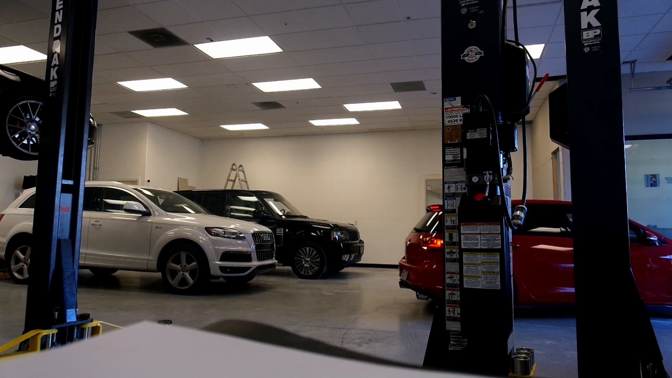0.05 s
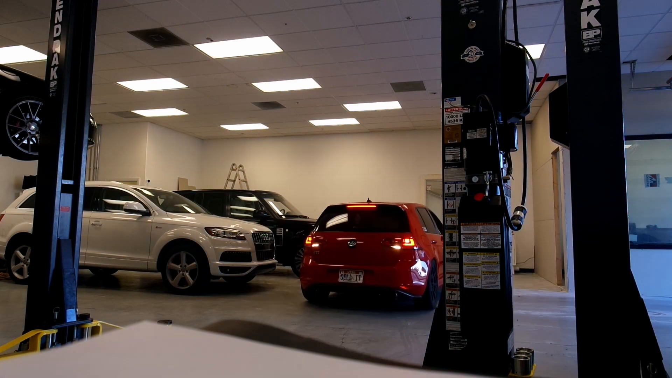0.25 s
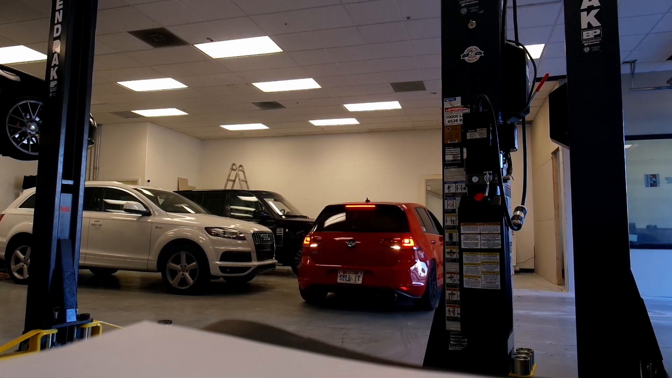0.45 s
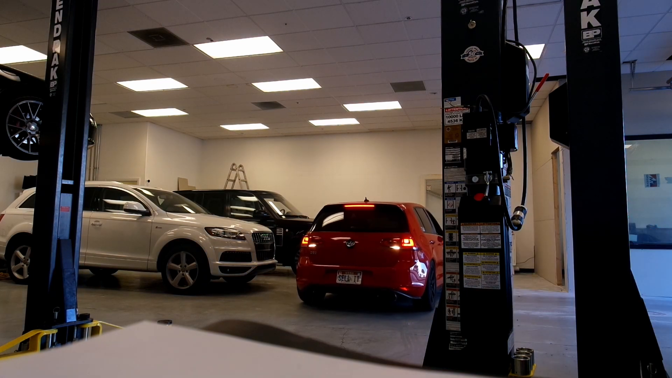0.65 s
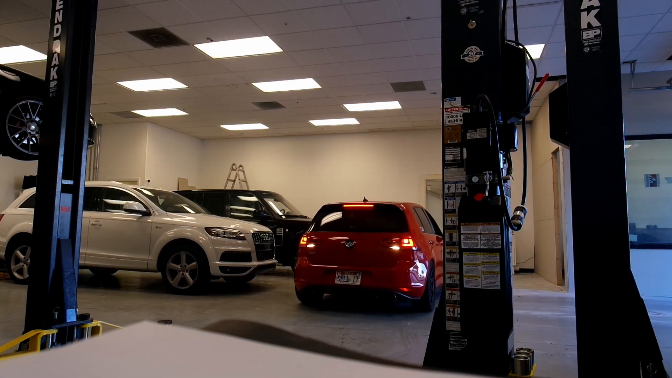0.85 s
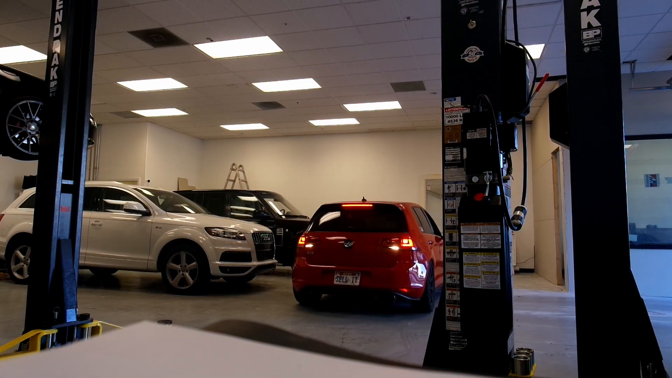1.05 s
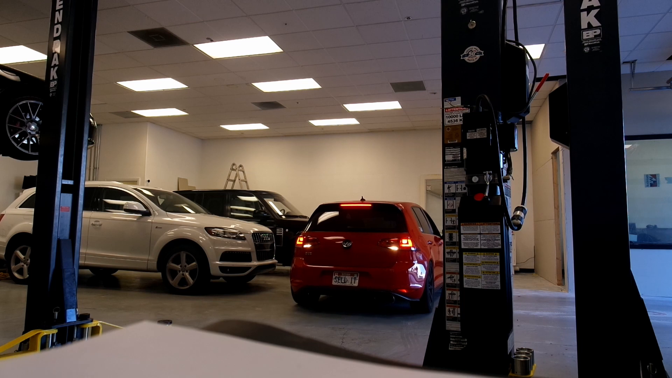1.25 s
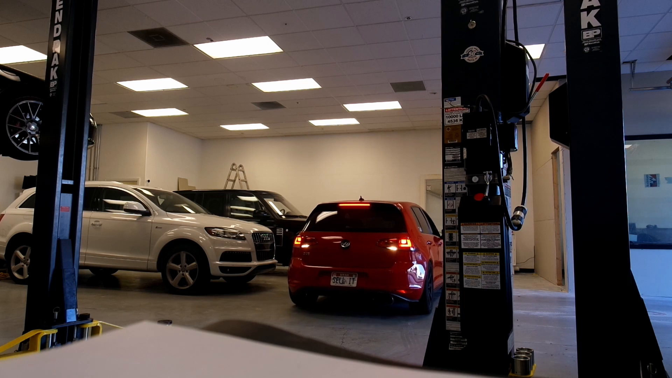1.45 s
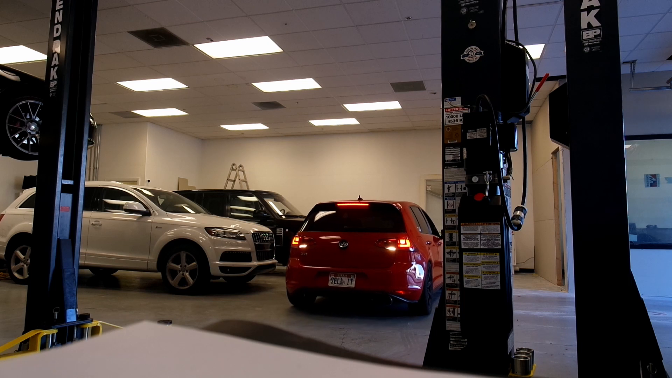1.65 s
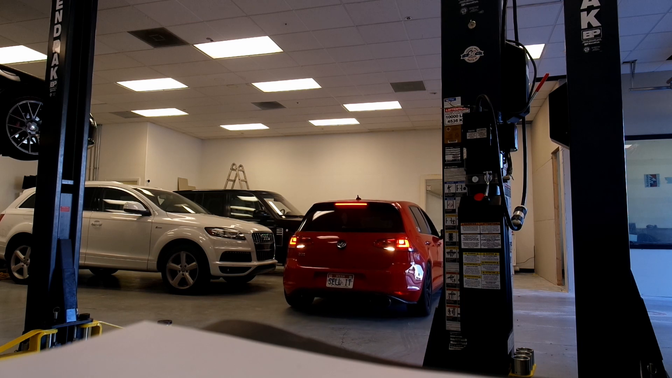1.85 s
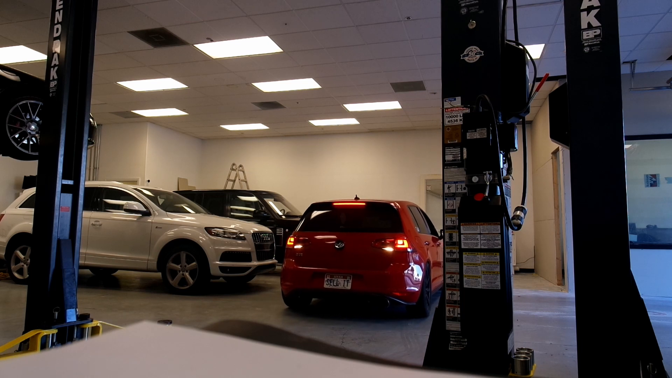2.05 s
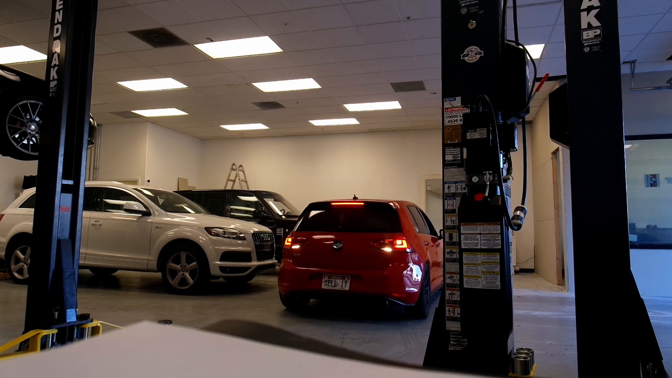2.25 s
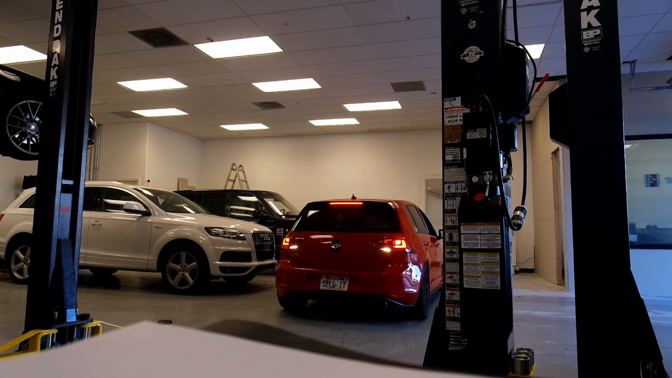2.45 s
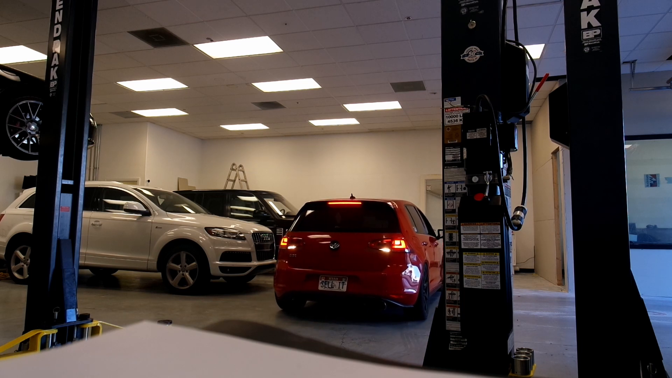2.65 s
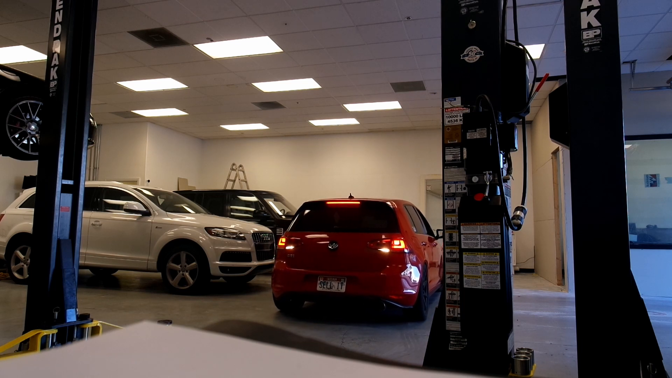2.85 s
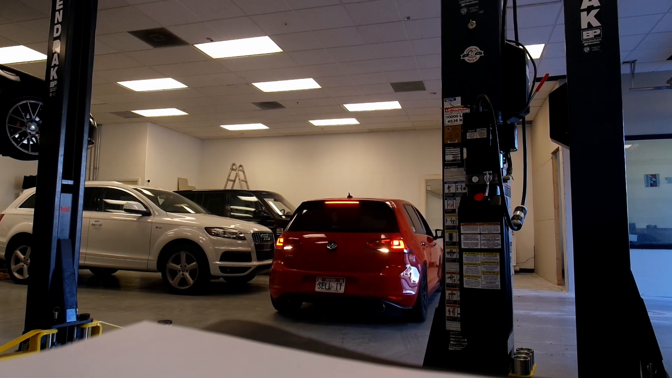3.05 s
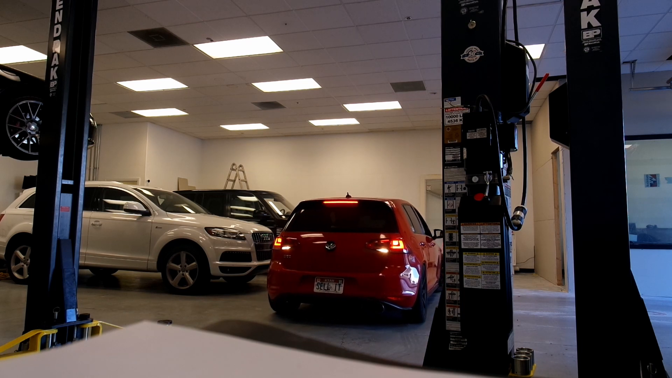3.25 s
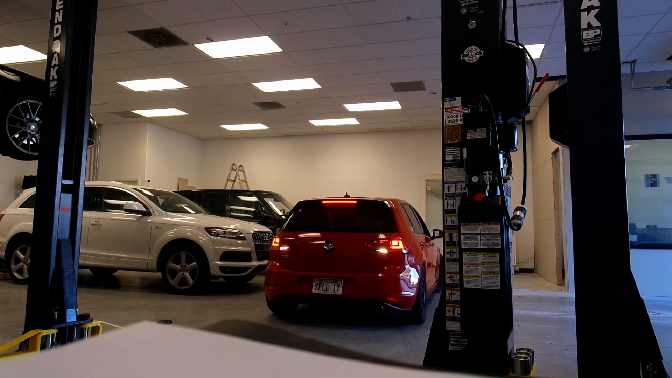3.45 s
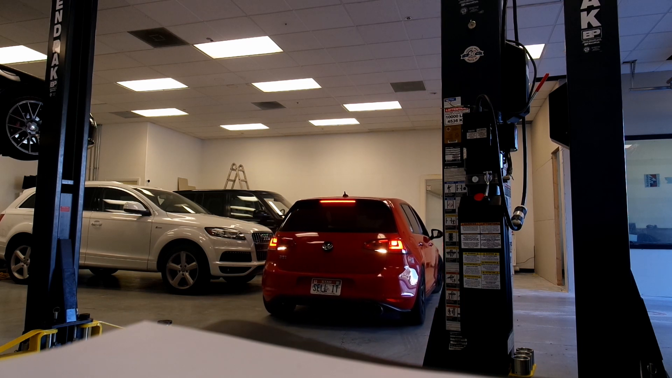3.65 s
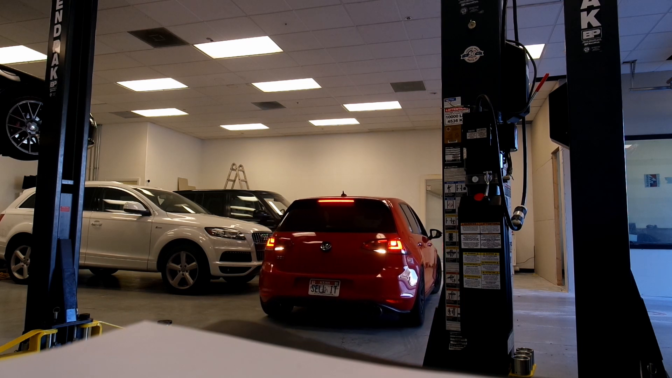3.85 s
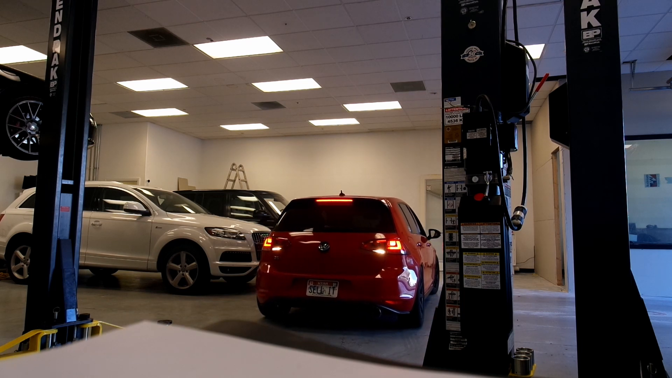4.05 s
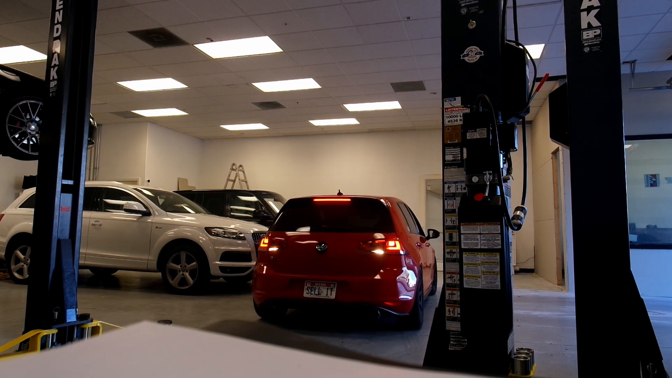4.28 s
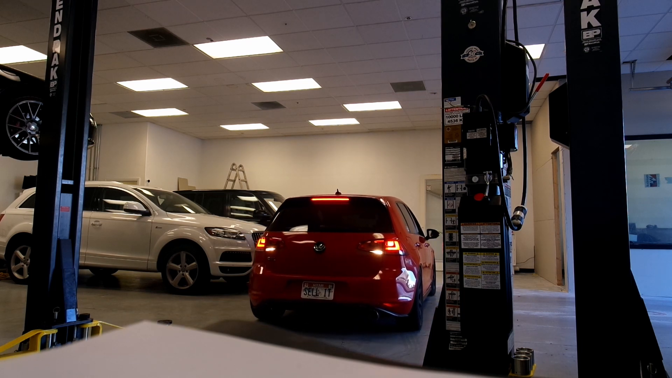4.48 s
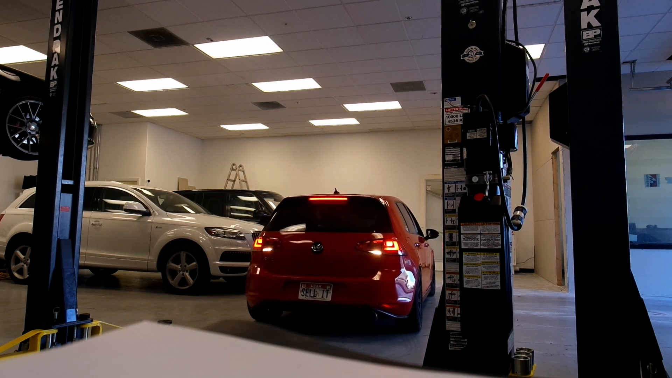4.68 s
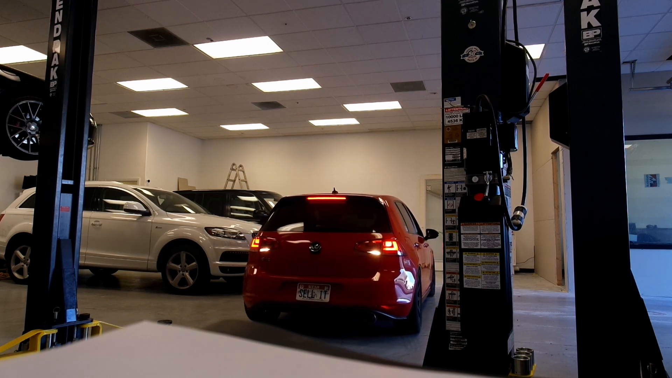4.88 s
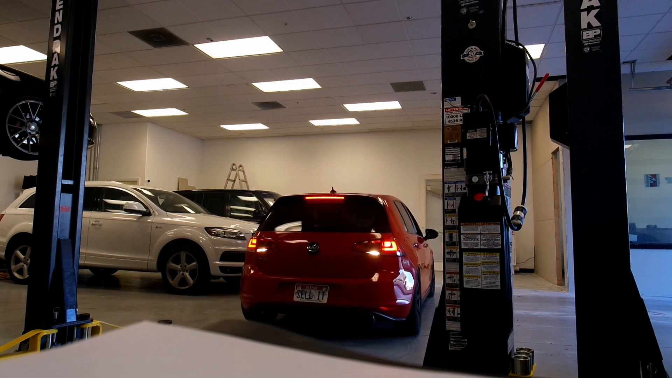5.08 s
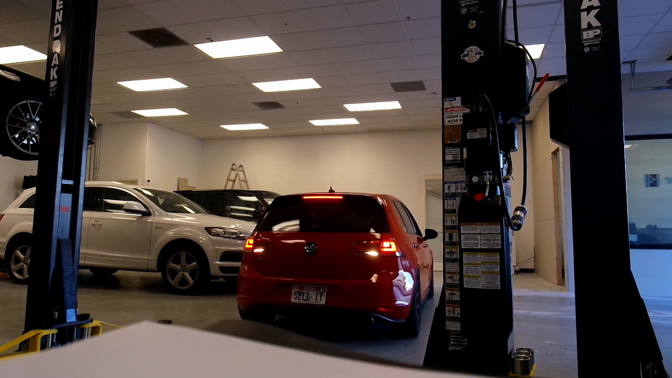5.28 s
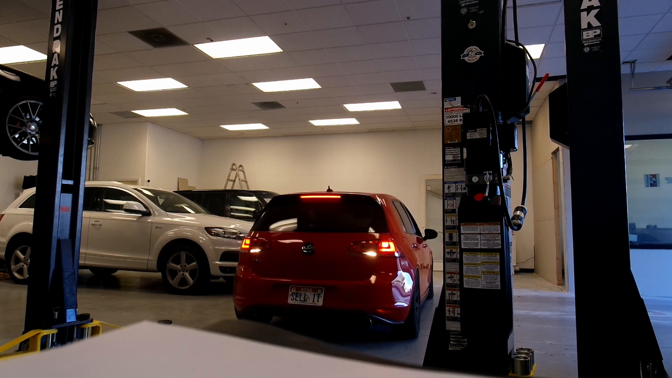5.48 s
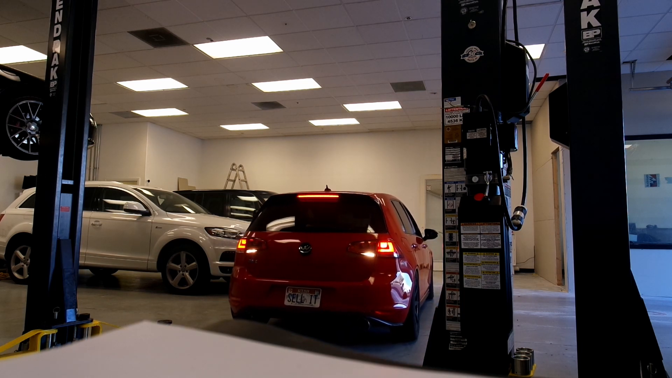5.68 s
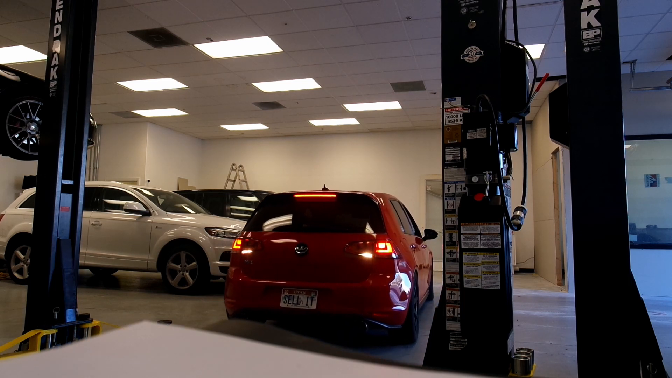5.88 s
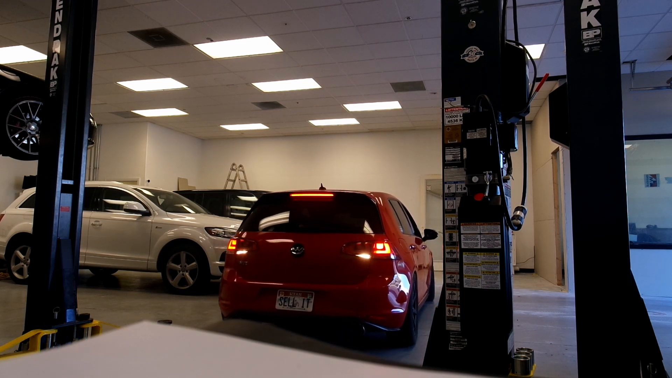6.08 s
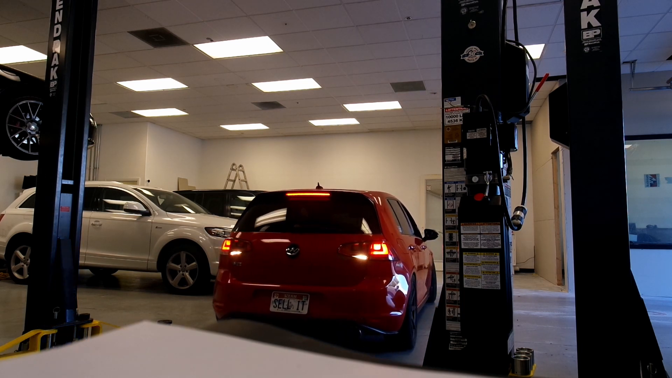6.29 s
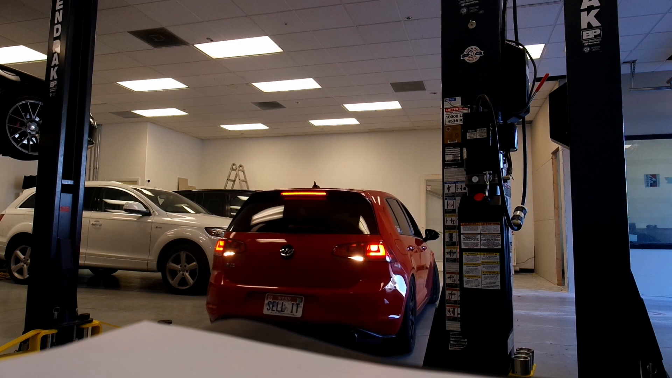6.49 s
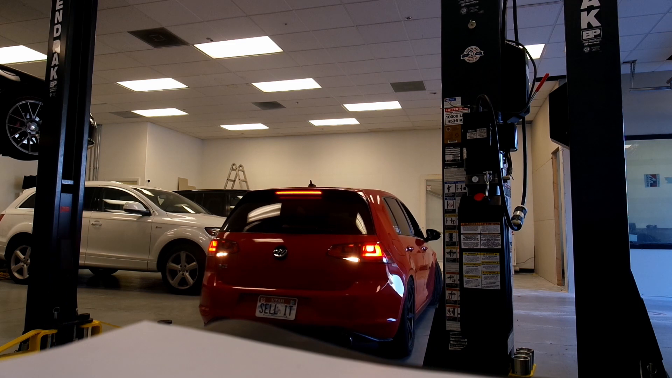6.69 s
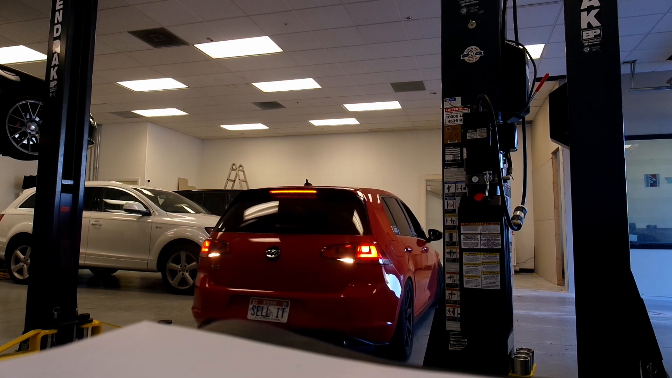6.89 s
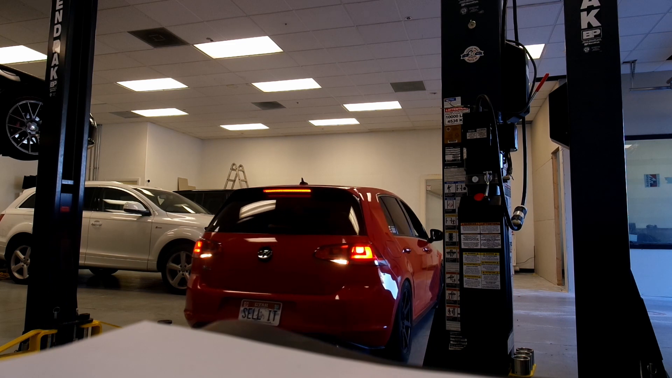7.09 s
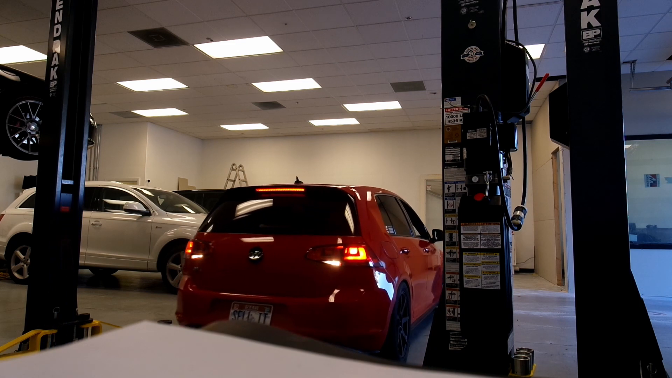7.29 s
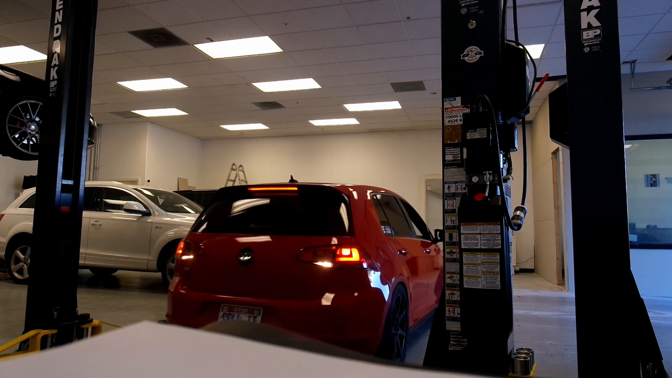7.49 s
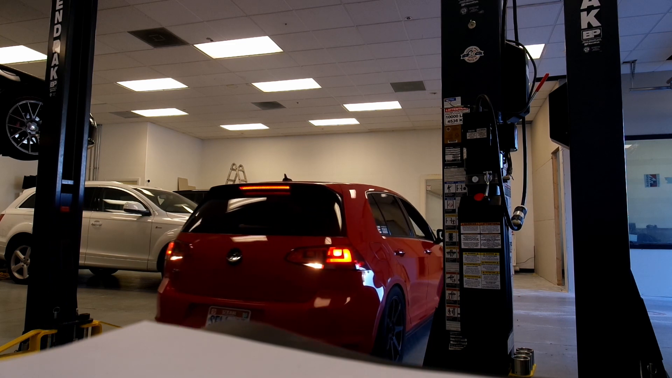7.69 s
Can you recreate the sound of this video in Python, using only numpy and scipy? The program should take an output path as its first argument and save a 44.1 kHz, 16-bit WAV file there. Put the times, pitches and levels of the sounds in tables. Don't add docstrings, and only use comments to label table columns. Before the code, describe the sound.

A small four-cylinder car backs slowly closer in a hard-walled workshop, its exhaust booming at idle with rattling knocks, faint tyre scrubs and brake groans.

```python
import sys
import numpy as np
from scipy import signal
from scipy.fft import rfft, irfft, next_fast_len
from scipy.io import wavfile

SR = 44100
rng = np.random.default_rng(int(sys.argv[2]) if len(sys.argv) > 2 else 0)


def volts_from_decibels(level):
    exponent = np.asarray(level, float) / 20
    return 10 ** exponent


def file_out(sig):
    cols = np.atleast_2d(sig).T
    lim = np.clip(cols, -1, 1)
    pcm = np.round(lim * 32767).astype(np.int16)
    wavfile.write(sys.argv[1], SR, pcm)


N = 340893
T_S = np.arange(N) / SR
CHANGE_S = 0.209
IDLE_PER_S = 28
MIDWAY_DB = -14

# [t/s, peak level/dB, favoured f/Hz]
HARD_KNOCK_EVENTS = [(0.733, -20, 945), (0.948, -24, 921), (1.232, -18, 1160), (1.729, -21, 929),
                     (1.799, -25, 821), (1.871, -21, 880), (2.01, -19, 900), (2.151, -26, 780),
                     (2.294, -25, 842), (2.438, -22, 880), (2.724, -17.5, 830), (2.795, -19, 840),
                     (3.833, -21, 740), (1.448, -26.5, 735), (3.033, -18.5, 880), (3.134, -22, 910),
                     (3.414, -25, 829), (3.448, -21, 826), (3.588, -23, 818), (3.694, -17, 740),
                     (4.262, -24, 816), (4.802, -21, 681), (5.548, -17, 826), (6.045, -19, 740),
                     (6.252, -20, 740), (6.468, -18.5, 740), (7.35, -25, 700), (6.613, -21, 760),
                     (6.689, -19, 662), (7.316, -18, 730)]


def rms_one(x):
    return x / np.sqrt(np.mean(x ** 2) + 1e-20)


def in_time(rows):
    s, value = np.transpose(rows)
    return np.interp(T_S, s, value)


def drift(rate_hz):
    r = np.exp(-80 * np.pi * rate_hz / SR)
    slow = signal.lfilter([1], [1, -2 * r, r * r], rng.standard_normal(N // 40 + 2002))[2000:]
    return np.interp(np.arange(N) / 40, np.arange(len(slow)), rms_one(slow))


def coloured(spectrum):
    size = next_fast_len(N)
    hz, db = np.transpose(spectrum)
    bin_hz = np.arange(size // 2 + 1) * SR / size
    gain = volts_from_decibels(np.interp(np.log(bin_hz + 1), np.log(hz), db, -90, -90))
    return rms_one(irfft(gain * rfft(rng.standard_normal(size)), size)[:N])


def resonate(x, hz, width_hz):
    r = np.exp(-np.pi * width_hz / SR)
    poles = [1, -2 * r * np.cos(2 * np.pi * hz / SR), r * r]
    return signal.lfilter([(1 - r * r) / 2, 0, (r * r - 1) / 2], poles, x)


def resonate_twice(x, hz, width_hz):
    return resonate(resonate(x, hz, width_hz), hz, width_hz)


def throb(firings, at, depth_db):
    return volts_from_decibels(depth_db * np.cos(2 * np.pi * (firings - at)))


def plateaus(spells):
    edge_s = 0.07
    return sum(db * (np.tanh((T_S - start) / edge_s) - np.tanh((T_S - end) / edge_s)) / 2
               for start, end, db in spells)


def crank(per_s):
    change = np.clip((T_S - CHANGE_S) / 0.006, 0, 1)
    return 0.14 + np.cumsum(per_s) / SR - 0.305 * change


def order_levels(per_s, boom_db):
    # [order, midway idle level/dB, share of nearness, slope/dB per firing/s off idle, bend/dB per its square]
    order_laws = [(2, -30, -0.21, -1, -1), (3, -29, -0.4, 1, -0.8), (5, -25, 0.8, 3.5, -4.5),
                  (6, -40, -.4, 0.3, -0.5), (7, -41, 0.18, 1.5, -0.2), (10, -43.5, 0.72, 2.5, -1.2),
                  (13, -39, 0.1, 1.5, -8)]
    early_levels = [-38, -49, -26, -50, -38.5, -60, -49]
    # [start t/s, end t/s, level/dB]
    standing_waves = [
        [(.95, 2.25, 1), (5.55, 6.05, -4), (6.12, 6.6, 3)],
        [(1.5, 2.74, -3.5), (5.4, 6.18, 2), (3, 5, -2.5)],
        [(1.6, 2.22, 4.5), (5.4, 6.75, 4)],
        [(2.3, 2.68, -7), (4.3, 4.68, -6), (5.33, 7.9, -9)],
        [(0.15, .95, 6), (1.63, 2.27, -7), (6, 6.6, 2), (6.9, 7.9, 6), (5.27, 5.36, -10), (4.15, 5, -2.5)],
        [(4.13, 4.63, -8), (5.25, 5.73, 5), (6.7, 7.73, -9), (2.25, 2.75, -11), (5.99, 6.75, 3),
         (3.1, 3.6, 2.5), (4.8, 5.2, -4.5)],
        [(.2, 1.45, -6.5), (3.65, 4.3, 3), (5.2, 6.0, -3), (6.2, 6.7, -22), (6.98, 7.9, -6)],
    ]
    off = per_s - IDLE_PER_S
    levels = []
    for (_, db, near, slope, bend), waves, early_db in zip(order_laws, standing_waves, early_levels):
        later_db = db + near * (boom_db - MIDWAY_DB) + slope * off + bend * off ** 2 + plateaus(waves)
        levels.append(np.where(T_S < CHANGE_S, early_db, later_db))
    return levels


def exhaust(firings, per_s, boom_db, levels):
    # [order, level/dB, wander/dB, pipe lag/rad]
    minor_orders = [(1, -41.5, 1.0, 2.4), (1.5, -54, 1.5, .5), (2.5, -56, 2.0, .5), (5.5, -55, 2.0, .5),
                    (7.5, -55, 2.0, .5), (8, -48, 2.0, .5), (11, -52, 2.0, .5), (12, -53, 2.0, -2.0),
                    (12.5, -48, 2.0, 2.8)]
    slip = (1.4 - 0.8 * (per_s - 28)) / (1 + (T_S / 4.2) ** 3)
    two, three, five, six, *buzz = levels
    since = T_S - CHANGE_S
    settling = 1.5 * np.exp(-(since / 0.16) ** 2) * (since > 0)
    orders = [(2, two, 0.15), (3, three, slip), (5, five, slip + settling)]
    orders += [(6, six + 1.2 * drift(1.3), 2.5)]
    orders += [(k, db, slip + 0.4 * drift(0.6)) for k, db in zip((7, 10, 13), buzz)]
    orders += [(k, db + wander_db * drift(1.0), lag) for k, db, wander_db, lag in minor_orders]
    uneven = throb(firings / 2, 0.88, 0.33)
    out = -volts_from_decibels(boom_db + 0.27 * drift(16.0)) * uneven * np.cos(8 * np.pi * firings)
    for k, db, lag in orders:
        out += volts_from_decibels(db + 0.48 * drift(7.5)) * np.cos(2 * np.pi * k * firings - lag)
    return np.sqrt(2) * out


def rasp(firings):
    # [f/Hz, width/Hz, level/dB]
    pipe_modes = [(352.5, 35, 1), (280, 70, -4), (237, 28, -12.5), (493.4, 38, -7)]
    gas = rng.standard_normal(N) * throb(firings, 0.67, 0.83) * throb(firings / 2, 0.71, 0.62)
    return rms_one(sum(volts_from_decibels(db) * resonate_twice(gas, hz, width_hz) / np.sqrt(width_hz)
                       for hz, width_hz, db in pipe_modes))


def ring_block(at, force_db, favour_hz):
    # [f/Hz, level/dB, t60/s]
    block_modes = [(727, -.5, 0.06), (830, 1.2, 0.055), (916, -0.5, 0.046), (1018, -4, 0.028),
                   (1173, 2.5, 0.058)]
    out = np.zeros(N)
    luck = rng.standard_normal((len(at), len(block_modes)))
    for k, (hz, db, t60_s) in enumerate(block_modes):
        clicks = np.full(N, 1e-18)
        clicks[at] = volts_from_decibels(force_db + db + 1.5 * luck[:, k] - 0.03 * abs(favour_hz - hz))
        r, w = volts_from_decibels(-60 / (t60_s * SR)), 2 * np.pi * hz / SR
        out += signal.lfilter([0, np.sin(w)], [1, -2 * r * np.cos(w), r * r], clicks)
    return resonate(resonate(out, 860, 420), 940, 450)


def knocks(firings):
    count = np.floor(firings - 0.35)
    at = np.flatnonzero(np.diff(count) > 0)
    turn = count[at + 1]
    luck = np.clip(rng.standard_normal((len(at), 2)), -3, 0.7)
    gap_s = np.abs(at[:, None] / SR - np.array(HARD_KNOCK_EVENTS)[:, 0]).min(axis=1)
    taken = gap_s <= 0.012
    force_db = -3.0 * (turn % 2) + 0.63 * (turn % 4 == 0) + 3.1 * luck[:, 0] - 30 * taken
    play_s = 0.0007
    at = at + (play_s * SR * np.abs(rng.standard_normal(len(at)))).astype(int)
    favour_hz = 910 - 20 * at / SR + 90 * luck[:, 1]
    return rms_one(ring_block(np.minimum(at, N - 1), force_db, favour_hz))


def hard_knocks():
    s, db, hz = np.transpose(HARD_KNOCK_EVENTS)
    return ring_block((s * SR).astype(int), db - 7.0, hz)


def shield():
    # [f/Hz, width/Hz, level/dB]
    sheet_modes = [(728, 15.4, 3.5), (835, 24, -5.5), (1155, 19, -7.5)]
    shake = rng.standard_normal(N)
    return sum(volts_from_decibels(db + 1.3 * drift(1.5)) * rms_one(resonate_twice(shake, hz, width_hz))
               for hz, width_hz, db in sheet_modes)


def loose_parts(firings):
    # [f/Hz, density/dB per Hz]
    clatter_spectrum = [(380, -1), (520, -3.5), (650, -2.5), (850, -6), (1240, -5), (1420, -16),
                        (2200, -16)]
    wander = volts_from_decibels(1.06 * drift(9.6) + 0.52 * drift(4.7))
    return coloured(clatter_spectrum) * throb(firings, 0.57, 0.86) * wander


def intake(firings):
    # [f/Hz, density/dB per Hz]
    intake_spectrum = [(900, -7), (1400, -1), (2100, -2), (3300, -2.5), (4300, -5), (5200, -8.5),
                       (7800, -18.5), (9500, -23)]
    wander = volts_from_decibels(0.55 * drift(12.0) + 0.2 * drift(4.0))
    return coloured(intake_spectrum) * throb(firings, 0.27, 0.5) * wander


def belt():
    # [f/Hz, density/dB per Hz]
    belt_spectrum = [(5000, -6), (7800, -1.5), (9500, -3.5), (12500, -0.5), (13800, -2), (15500, -7.5)]
    return coloured(belt_spectrum) * volts_from_decibels(0.5 * drift(15.0))


def injectors(firings):
    phase = firings - 0.43
    strengths = volts_from_decibels(5.1 * rng.standard_normal(int(firings[-1]) + 3))
    strength = strengths[(phase + 1).astype(int)]
    ticks = rng.standard_normal(N) * strength * np.exp(-(phase % 1) / 0.11)
    return rms_one(resonate(ticks, 12800, 2500))


def brakes():
    groan_events = [
        (2.58, 2.78, 185, 180, -54),
        (5.3, 5.9, 192.5, 170, -36),
        (7.15, 7.44, 335, 315, -37),
        (7.4, 7.62, 293, 290, -37.5),
        (7.563, 7.724, 486, 484, -35.5),
        (7.25, 7.55, 482, 482, -40.5),
        (6.95, 6.4, 285, 300, -39),
    ]
    out, tremble = np.zeros(N), volts_from_decibels(1.6 * drift(17.0))
    for start, end, from_hz, to_hz, db in groan_events:
        part = np.clip((T_S - start) / (end - start), 0, 1)
        phase = 2 * np.pi * np.cumsum(from_hz + (to_hz - from_hz) * part) / SR
        out += volts_from_decibels(db + 0.5) * np.sin(np.pi * part) * np.sin(phase)
    return out * tremble


def tyres():
    # [start t/s, end t/s, centre f/Hz, width/Hz, level/dB]
    scrub_events = [
        (1.42, 1.64, 4000, 5000, -50),
        (2.55, 2.82, 3000, 2000, -43.5),
        (2.58, 2.82, 6500, 4000, -47.5),
        (3.38, 3.78, 4500, 5000, -54),
        (4.45, 4.78, 2300, 500, -48.5),
        (5.255, 5.62, 2050, 900, -43),
        (6.0, 6.13, 2130, 902, -44),
        (7.0, 7.5, 5000, 5000, -56),
    ]
    out, rubber = np.zeros(N), rng.standard_normal(N)
    for start, end, hz, width_hz, db in scrub_events:
        swell = np.sin(np.pi * np.clip((T_S - start) / (end - start), 0, 1)) ** 0.29
        out += volts_from_decibels(db) * swell * rms_one(resonate_twice(rubber, hz, width_hz))
    return out


def workshop(x):
    t60_s = 0.99
    size = next_fast_len(N + SR)
    w = 2 * np.pi * np.arange(size // 2 + 1) / size
    lags = rng.integers(900, 2400, 10)
    loops = [volts_from_decibels(-60 * lag / SR / t60_s) * np.exp(-1j * w * lag) for lag in lags]
    return rms_one(irfft(rfft(x, size) * sum(g / (1 - g) for g in loops), size)[:N])


def rumble():
    # [f/Hz, density/dB per Hz]
    rumble_spectrum = [(4, -10), (15, -18), (40, -26), (70, -6), (130, -1.5), (200, -3.5), (300, -6),
                       (500, -18)]
    return volts_from_decibels(-41.5) * coloured(rumble_spectrum)


def scene():
    # [t/s, firings per s]
    speed = [(0.215, 28.079), (1.16, 28.169), (1.41, 27.91), (1.95, 28.626), (2.37, 27.831), (2.64, 27.864),
             (2.88, 29.174), (3.08, 29.474), (3.33, 28.66), (3.94, 28.245), (4.46, 27.467), (4.83, 27.924),
             (5.0, 27.854), (5.88, 29.058), (6.2, 27.645), (6.73, 27.6), (6.98, 28.807), (7.73, 28.632)]
    # [t/s, level/dB]
    nearness = [(0, -18.5), (.2, -20.5), (.23, -22.5), (.42, -20), (1.56, -16.5), (2.76, -14), (2.98, -16),
                (3.93, -11.6), (4.41, -13.1), (4.65, -11.7), (5.8, -11.6), (6.48, -9.9), (6.63, -11),
                (7.73, -10.5)]
    # [t/s, level/dB]
    load = [(0, -0.7), (1.3, -2), (1.54, 1), (1.71, -2.5), (2.52, -1.5), (2.65, 2.5), (2.85, 1.3),
            (3.3, 0.3), (3.62, 3.5), (3.78, 1.8), (4.29, -2), (4.65, 1), (5.1, -2.5), (5.46, 2.5),
            (5.84, -.5), (6.07, 1.5), (6.74, -2.5), (7.21, 4)]
    # [start t/s, end t/s, level/dB]
    shield_spells = [
        (1.8, 2.35, 7),
        (2.55, 3.15, 8.5),
        (3.3, 4.05, 4),
        (5.7, 6.65, 6.5),
    ]
    per_s = np.where(T_S < CHANGE_S, 27.45, in_time(speed))
    boom_db, load_db = in_time(nearness), in_time(load)
    near_db, spells_db = boom_db - MIDWAY_DB, plateaus(shield_spells)
    firings = crank(per_s)

    levels = order_levels(per_s, boom_db)
    pipe_db = 0.14 * (levels[-1] + 43)
    rasp_db = -43 + 0.4 * load_db + 0.1 * near_db + pipe_db + 1.7 * drift(2.9)
    car = exhaust(firings, per_s, boom_db, levels) + volts_from_decibels(rasp_db) * rasp(firings)

    clatter_db = -39 + 0.55 * load_db
    knock_db = clatter_db - 8.0 + 0.27 * spells_db + 0.11 * near_db
    knock = volts_from_decibels(knock_db) * knocks(firings) + hard_knocks()
    clatter = volts_from_decibels(-18.5 + spells_db) * shield()
    clatter += volts_from_decibels(-7.5) * workshop(knock) + volts_from_decibels(-1.0) * loose_parts(firings)
    car += knock + volts_from_decibels(clatter_db) * clatter

    flank_db = 2.5 * np.exp(-T_S / 0.48)
    car += volts_from_decibels(-41 + 0.65 * load_db + 0.25 * flank_db) * intake(firings)
    car += volts_from_decibels(-48 + 0.55 * load_db + flank_db) * (belt() + volts_from_decibels(-13.5) * injectors(firings))
    car += brakes() + tyres() + rumble()
    return car[None]


def low_pass(x):
    return signal.sosfilt(signal.butter(12, 15030, fs=SR, output="sos"), x)


def record(dry):
    return low_pass(dry)


dry = scene()
out = record(dry)
file_out(out)
```